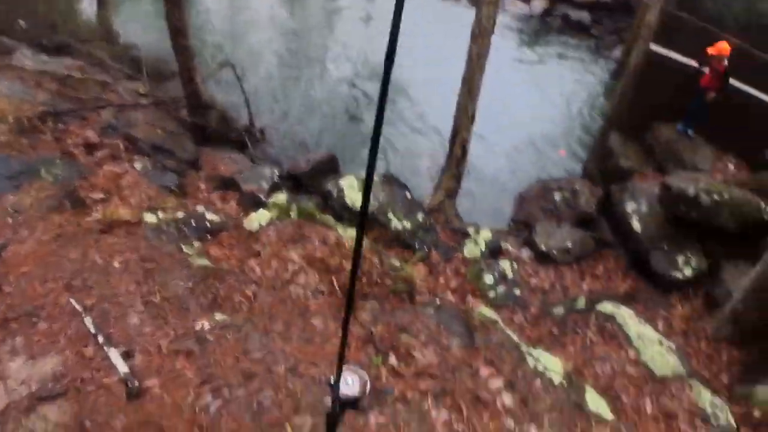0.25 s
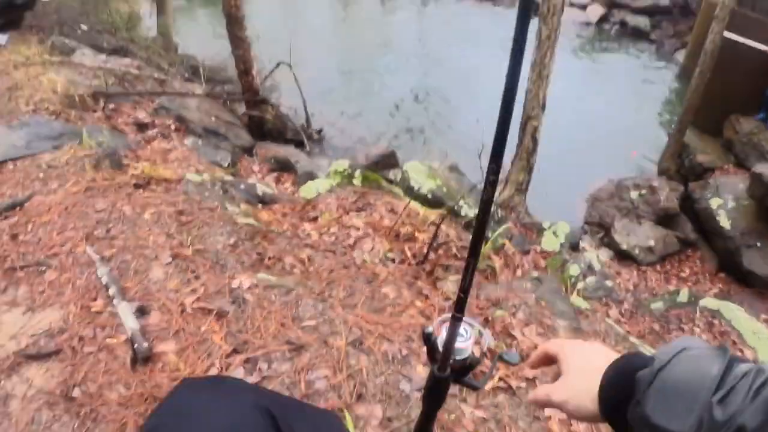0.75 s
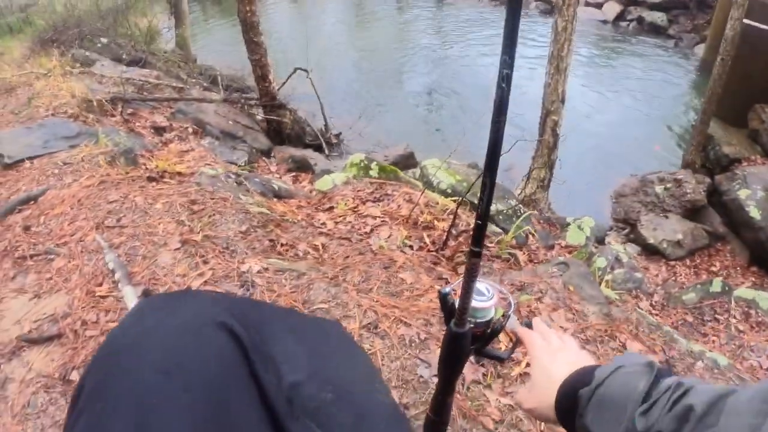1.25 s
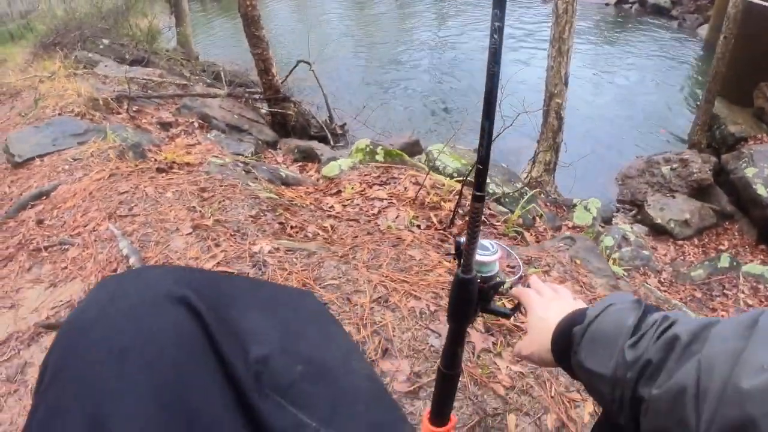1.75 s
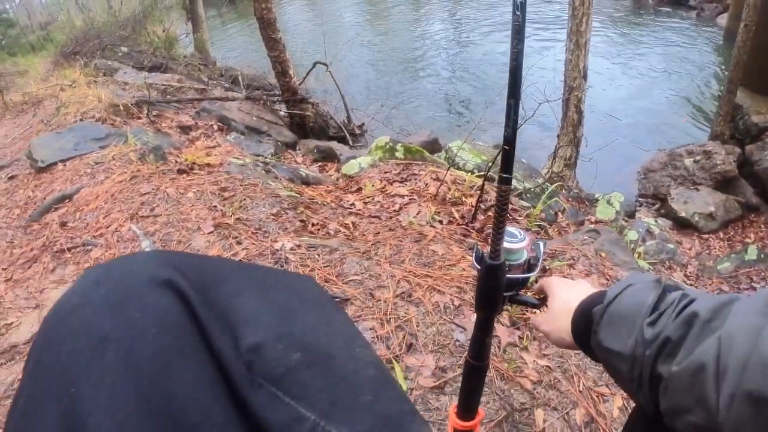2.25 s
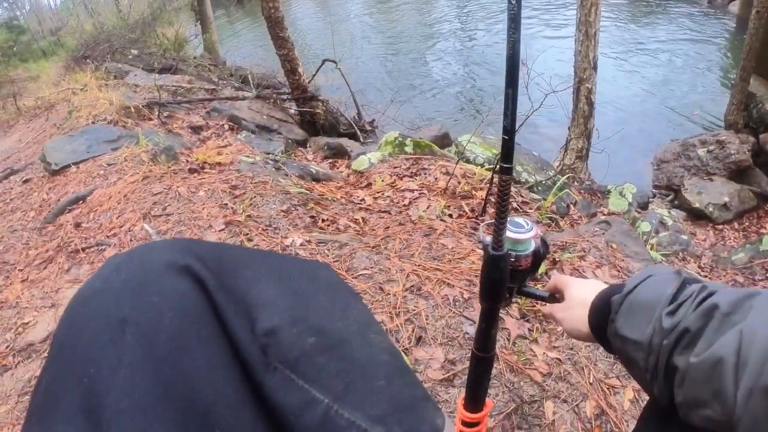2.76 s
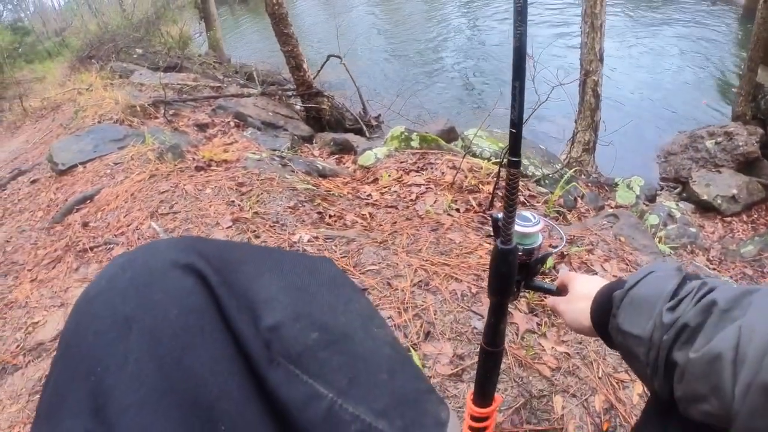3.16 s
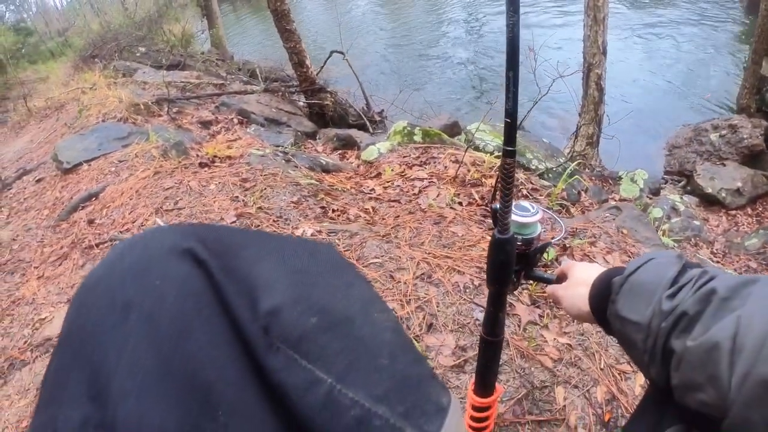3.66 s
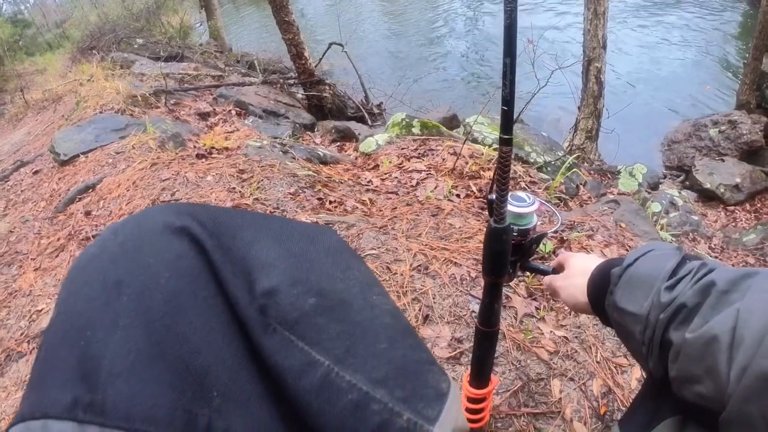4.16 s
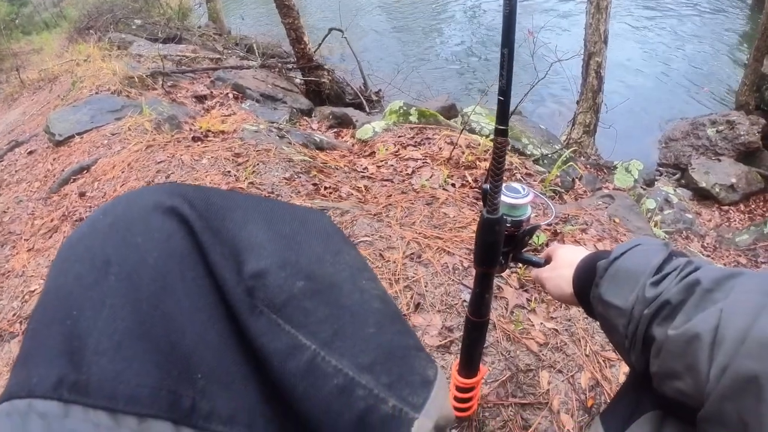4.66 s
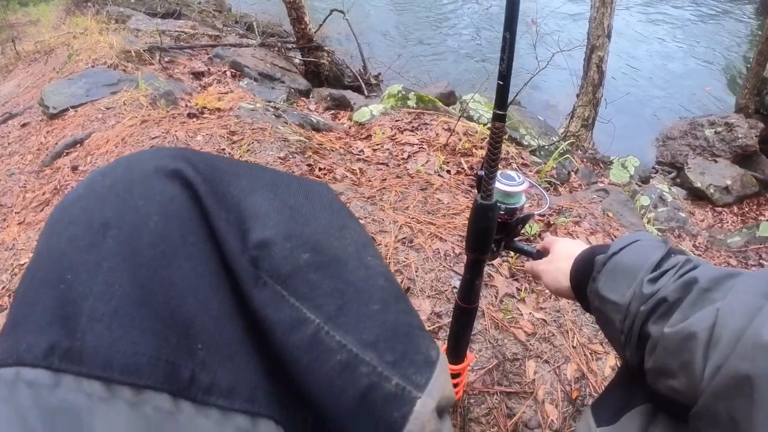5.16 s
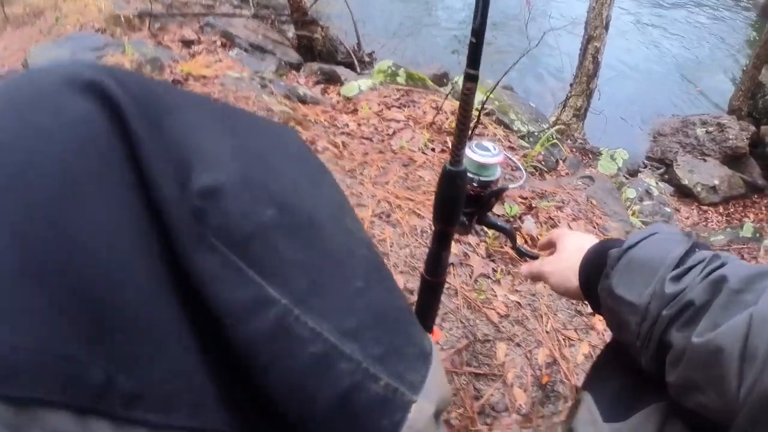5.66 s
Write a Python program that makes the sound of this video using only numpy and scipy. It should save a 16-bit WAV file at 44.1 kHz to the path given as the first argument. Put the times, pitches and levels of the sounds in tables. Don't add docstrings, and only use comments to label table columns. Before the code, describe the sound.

Heard from inside a chest-worn camera beside a creek: cloth rumble, then two clattering plastic knocks as a rod hits the housing, each briefly sinking the background. A quieter stretch follows with soft taps, tiny reel and leaf ticks and dulled rushing water with a thin hiss. Near the end, a strap jerks and rubs loudly over the shell, starting toward the right.

```python
import sys
import numpy as np
from scipy import signal
from scipy.io import wavfile

SR = 44100
rng = np.random.default_rng(int(sys.argv[2]) if len(sys.argv) > 2 else 0)


def rack_gain(trim_db):
    fader = np.asarray(trim_db, float)
    return 10 ** (fader / 20)


def pcm_store(signal):
    levels = np.round(np.clip(np.atleast_2d(signal), -1, 1) * 32767)
    wavfile.write(sys.argv[1], SR, levels.astype(np.int16).T)


N = 260190

# f/Hz, left level/dB, right level/dB, t60/s
LOW_MODES = [(105, -33.5, -15.5, 0.032), (208.5, 4, -12.5, 0.011), (328, -6, 2, 0.037),
             (347.5, 2.5, -6.5, 0.028), (495, -23.5, -21.5, 0.062)]
# f/Hz, left level/dB, right level/dB, t60/s
MAIN_MODES = [(789.9, -14, 2, 0.074), (925, -3, -19, 0.04), (990, -14.5, -43.5, 0.0069)]
# f/Hz, left level/dB, right level/dB, t60/s
SECOND_MODE = [(688, 2.1, 0.0084, 0.053)]
# f/Hz, left level/dB, right level/dB, t60/s
HIGH_MODES = [(1428, -1, 6.5, 0.019), (1517, -6, 7, 0.011), (1745, 7, -19, 0.03), (1916, 10.5, -2, 0.0054),
              (2272, 0.5, -9, 0.024), (2500, -32, -6, 0.01), (3780, -3, 2, 0.01), (4730, 2.5, 3.5, 0.018)]


def in_time(rows):
    s, *columns = np.transpose(rows)
    return [np.interp(np.arange(N) / SR, s, c) for c in columns]


def at_hz(points, hz):
    point_hz, values = np.array(points).T
    return np.interp(np.log(hz), np.log(point_hz), values)


def rms_one(x):
    return x / np.sqrt(np.mean(x ** 2) + 1e-20)


def panned(db):
    return np.array([rack_gain(db / 2), rack_gain(-db / 2)]) / np.cosh(db * np.log(10) / 40)


def low_pass(x, hz):
    return signal.sosfilt(signal.butter(8, hz, fs=SR, output="sos"), x + 1e-18)


def band_pass(x, low_hz, high_hz):
    return signal.sosfilt(signal.butter(2, [low_hz, high_hz], "band", fs=SR, output="sos"), x)


def dying_noise(pushes, t60, noise):
    return signal.lfilter([1], [1, -rack_gain(-60 / (t60 * SR))], pushes + 1e-18) * noise


def drift(rate):
    r = np.exp(-80 * np.pi * rate / SR)
    kicks = rng.standard_normal(N // 40 + 2002)
    slow = signal.lfilter([1], [1, -2 * r, r * r], kicks)[2000:]
    return np.interp(np.arange(N) / 40, np.arange(len(slow)), rms_one(slow))


def banded_noise(spectrum, likeness, shared_db, own_db, rate):
    lowest, highest = spectrum[0][0], spectrum[-1][0]
    edges = lowest * 2 ** np.arange(0, np.log2(highest / lowest) + 1 / 3, 1 / 3)
    out, together, white = 0, drift(rate), rng.standard_normal((2, 2, N))
    for k, (low, high) in enumerate(zip(edges, edges[1:])):
        mid, side = band_pass(white[k % 2], low, high)
        hz = np.sqrt(low * high)
        alike = np.clip(at_hz(likeness, hz), -1, 1)
        gain = rack_gain(at_hz(spectrum, hz) + shared_db * together + own_db * drift(rate))
        out = out + gain * (np.sqrt(1 + alike) * mid + np.sqrt(1 - alike) * side * [[1], [-1]])
    return out


def housing(pushes, modes, left_sign, damping=1):
    out = np.zeros((2, N))
    for k, (hz, left_db, right_db, t60) in enumerate(modes):
        r = rack_gain(-60 * damping / (t60 * SR))
        w = 2 * np.pi * hz / SR
        rung = signal.lfilter([0, np.sin(w)], [1, -2 * r * np.cos(w), r * r], pushes + 1e-18)
        out += (-1) ** k * rung * [[left_sign * rack_gain(left_db)], [rack_gain(right_db)]]
    return out


def blows(events, low_modes, soft_hz, hard_hz, rattle_db, rattle_s, damping, crack_db):
    s, peak_db, pan_db, low_db, second_db, high_db = np.transpose(events)
    at = np.minimum((s * SR).astype(int), N - 1)
    strength = rack_gain(peak_db + 2.5) * np.array([rack_gain(pan_db), np.ones(len(at))])
    chatter = rng.standard_normal(N)
    pushes, out = np.zeros((2, N)), np.zeros((2, N))
    families = ((low_modes, rack_gain(low_db + 6.5), 1, soft_hz),
                (MAIN_MODES, 1, -1, soft_hz),
                (SECOND_MODE, -rack_gain(second_db), -1, soft_hz),
                (HIGH_MODES, rack_gain(high_db), 1, hard_hz))
    for modes, share, sign, contact_hz in families:
        pushes[:, at] = share * strength
        rattle = dying_noise(pushes, rattle_s, chatter)
        out += housing(low_pass(pushes + rack_gain(rattle_db) * rattle, contact_hz), modes, sign, damping)
    return out + rack_gain(crack_db) * band_pass(rattle, 3200, 6500)


def rod_knocks():
    # t/s, peak level/dB, left-right level/dB, low modes level/dB, high modes level/dB
    knocks = [(0.42, -25, 1.5, -9, -3), (0.429, -27, -4.5, 4.5, 4), (0.432, -15, -10.5, 1.5, -2.5),
              (0.446, -33.5, -4, 2, -3), (0.462, -27, -5, -5, -15), (0.826, -23, -7, 7.5, -24),
              (0.838, -41, -19, 10, -36), (0.847, -28.5, -27, 5, -14), (0.857, -25, -19, -13, -18),
              (0.869, -26, -2, -8, -1), (0.877, -11.5, -4.5, -7, -12), (0.884, -14.5, -4, -8, -8),
              (0.887, -29, -4, 1, -25), (0.893, -36.5, -10.5, -6, -31)]
    second_db = -4
    hits = [(s, db, pan, low, second_db, high) for s, db, pan, low, high in knocks]
    return blows(hits, LOW_MODES, soft_hz=1210, hard_hz=2750,
                 rattle_db=-17.5, rattle_s=0.011, damping=0.97, crack_db=-33)


def strap_slips():
    # t/s, peak level/dB, low modes level/dB, second mode level/dB
    slips = [(5.277, -23, -8, -4), (5.299, -21, -27, -0.5), (5.321, -28, -6, 0), (5.379, -21, -0.5, -16),
             (5.407, -17, -1.5, -15), (5.429, -12.5, -16, 1.5), (5.454, -27, 1, 13.5),
             (5.471, -17.5, 0.5, -3), (5.487, -31.5, -18, -18), (5.501, -10.5, -21, -16),
             (5.519, -23, -22, 11), (5.534, -27, -11, -2), (5.552, -16.5, -4.5, 5), (5.579, -13, -3, 1),
             (5.611, -42.5, 9, 2), (5.653, -10, -8, 3), (5.675, -15, -12.5, -5), (5.697, -18, -2, 6),
             (5.731, -10, -11, 3.5), (5.754, -12.5, -10.5, -5), (5.776, -21, -8, 6), (5.809, -15, -5, 8.5),
             (5.83, -22.5, -5, -15), (5.856, -10.5, -10.5, 2.5), (5.892, -10, -8.5, 0.5)]
    # t/s, left-right level/dB
    path = [
        (5.48, -19.5),
        (5.66, -1.5),
    ]
    # f/Hz, left level/dB, right level/dB, t60/s
    held_modes = [(105, -16, -8.5, 0.094), (230, -7, -18, 0.0087), (334.4, -5, -7, 0.12),
                  (482, 11, -26, 0.01)]
    edge_db = -42.5
    jerks = [(s, db, np.interp(s, *np.transpose(path)), low, second, edge_db - db)
             for s, db, low, second in slips]
    return blows(jerks, held_modes, soft_hz=786, hard_hz=2580,
                 rattle_db=-30.5, rattle_s=0.028, damping=2.19, crack_db=-36.0)


def light_taps():
    # t/s, peak level/dB, low modes level/dB, high modes level/dB
    taps = [(0.215, -35.5, 1, -19), (0.241, -37, 1, -11.5), (0.359, -38.5, -3, -5),
            (0.747, -43.5, 5.5, -27), (0.985, -52.5, 11.5, -38), (1.189, -53.5, 20.5, -20),
            (1.312, -49, -14, -28), (1.339, -37.5, 2, -12), (1.356, -27.5, -3, -20),
            (1.492, -47, 15, -30), (1.536, -44, -0.5, -25), (1.696, -50, 10, -21), (4.239, -60.5, 0, 8),
            (1.817, -34, -8, -31), (1.873, -29, -24, -11), (1.958, -32, -8, -28),
               (2.043, -34.5, -12, -23), (2.113, -31.5, -1.5, -18), (2.142, -32, -5, -15.5),
               (2.185, -28, 0, -16), (2.238, -32.5, -7, -37), (2.328, -42, 5.5, -29),
               (2.377, -37.5, 2, -32), (2.553, -33, -18, -46), (2.773, -38, -19, -28),
               (2.812, -16, -23, -15.5), (2.864, -37.5, -15, -35), (2.951, -44.5, -5, -7),
               (2.972, -53, -12, 2), (3.124, -57, 3, -15), (3.144, -58.5, -17, 11),
               (3.201, -45.5, -22, -13), (3.343, -68, -16, -26), (3.495, -41, -7, -25),
               (3.644, -41, 4, -13), (3.75, -38.5, -13, -18), (3.927, -34.5, -7, -15.5),
               (4.051, -47, -6, -7), (4.433, -41, -3, -21), (4.654, -45, -2, -24), (4.746, -44.5, -20, -24),
               (5.014, -47, 5, -11), (5.123, -39.5, 7, -16)]
    pan_db, second_db = -19, -31
    touches = [(s, db, pan_db, low, second_db, high) for s, db, low, high in taps]
    return blows(touches, LOW_MODES, soft_hz=998, hard_hz=3080,
                 rattle_db=-33.0, rattle_s=0.003, damping=0.83, crack_db=-12.5)


def rubbing():
    # t/s, level/dB
    drag = [(0, -108), (.19, -40), (.35, -47), (.43, -55.5), (.7, -53.5), (.83, -36), (.88, -46.5),
            (1.1, -48.5), (1.4, -45.5), (2.0, -47), (2.3, -50.5), (3.1, -54.5), (4.3, -53), (4.93, -69),
            (5.25, -45), (5.52, -26), (5.61, -33.5), (5.9, -27.5)]
    level_db, = in_time(drag)
    bright_db = 0.33 * (-50.5 - level_db)
    sizes = rack_gain(3.5 * np.minimum(rng.exponential(1, N), 3)) * rng.choice([-1, 1], N)
    catches_per_s = 1500 * rack_gain(3.0 * drift(25))
    catches = sizes * (rng.random(N) < catches_per_s / SR)
    pushes = catches * rack_gain([[-9.0], [0.1]])
    body = housing(pushes, MAIN_MODES, -0.064, damping=1.64)
    body = low_pass(body - housing(pushes, SECOND_MODE, -0.69, damping=1.6), 915)
    bright = low_pass(housing(pushes, HIGH_MODES, 0.9, damping=0.99), 2400)
    both = body + rack_gain(bright_db - 18.5) * bright
    return both / body.mean(0).std() * rack_gain(level_db - 2.0)


def rumble():
    # t/s, level/dB, left-right level/dB
    cloth = [(0, -42, 15), (.2, -38.5, -6.5), (.43, -37, -12), (.7, -36.5, 7), (.84, -31.5, -14),
             (1.0, -36, 5.5), (1.35, -39, -8.5), (1.7, -38.5, -8), (2.0, -43.5, -11), (2.18, -38, -11),
             (2.3, -43.5, -7.5), (3.2, -43, -4.5), (4.2, -42.5, -7.5), (4.79, -45.5, -2.5),
             (4.93, -50.5, -3.5), (5.27, -39.5, -8), (5.42, -28, -16), (5.9, -38, -2.5)]
    # f/Hz, level per Hz/dB
    spectrum = [(13, -46), (22, -15.5), (79, -3), (124, 1), (234, -6.5), (305, -6.5), (396, -19.5),
                (481, -19), (600, -15.5), (780, -33.5), (1320, -120)]
    # f/Hz, left-right likeness/1
    likeness = [(30, 0.056), (130, 0.46), (300, 0.11), (600, 0.15)]
    level_db, pan_db = in_time(cloth)
    lumps = banded_noise(spectrum, likeness, shared_db=-1.0, own_db=3.5, rate=15.5)
    return rms_one(lumps) * rack_gain(level_db + 2.0) * panned(pan_db)


def ticks():
    # t/s, peak level/dB, left-right level/dB
    tick_events = [(1.6571, -41, -15), (2.0182, -43.5, -21), (2.6777, -55, -7), (2.7177, -51, -8),
                   (2.8104, -45.5, -5.5), (3.4719, -47.5, -19), (3.5493, -45, -4.5), (4.0641, -48, -17),
                   (4.3375, -51, -4.5), (4.4876, -51, -12), (4.689, -51.5, -11), (5.0898, -50, -20),
                   (5.5871, -52.5, 14)]
    s, peak_db, pan_db = np.transpose(tick_events)
    clicks = np.zeros((2, N))
    clicks[:, (s * SR).astype(int)] = rack_gain(peak_db + 17) * panned(pan_db)
    tail = dying_noise(clicks, 0.0081, rng.standard_normal(N))
    return band_pass(clicks + rack_gain(-25.0) * tail, 9000, 17000)


def flaring():
    # t/s, length/s, level/dB
    flares = [(0.677, 0.29, 4), (1.15, 0.16, 10), (1.383, 0.22, 16.5), (1.568, 0.12, 8.5), (2.115, 0.17, 5),
              (2.963, 0.07, 3.5), (3.39, 0.048, 4.5), (3.677, 0.11, 3), (4.255, 0.049, 5.5), (5.4, .12, 3),
              (5.83, 0.068, 2)]
    t = np.arange(N) / SR
    return sum(db * np.exp(-(2 * (t - s) / length_s) ** 2) for s, length_s, db in flares)


def water():
    # t/s, level/dB, left-right level/dB
    stance = [(0, -58, 12.5), (.19, -57, -2.5), (.33, -56, -6.5), (.45, -49, 0), (.69, -54, 7.5),
              (.85, -52.5, -0.5), (1.1, -56.5, 9.5), (1.37, -65, -5.5), (1.69, -60.5, -4.5),
              (2.0, -60, -2.5), (2.3, -62.5, -4.5), (3.3, -65, -4), (4.2, -63.5, -5.5), (4.79, -66, -4),
              (4.93, -72.5, -3.5), (5.15, -63.5, -7), (5.55, -63, 1.5), (5.9, -58.5, 13.5)]
    # f/Hz, level per Hz/dB
    spectrum = [(240, -0.5), (400, -3), (460, -19), (626, -9), (777, -5.5), (1070, -18.5), (1440, -17),
                (1680, -22), (4050, -34), (5690, -53), (7280, -55.5), (9320, -35.5), (12300, -20),
                (14600, -32), (16000, -27.5)]
    # f/Hz, left-right likeness/1
    likeness = [(400, 0.067), (1200, 0.59), (2500, 0.021), (5000, 0.03), (7000, 0.3), (10500, 0.64),
                (15000, 0.95)]
    water_db, pan_db = in_time(stance)
    flare_db = flaring()
    roar_db = 0.13 * (-59.5 - water_db) - 0.56 * flare_db
    rush = banded_noise(spectrum, likeness, shared_db=1.2, own_db=.4, rate=24)
    roar = low_pass(rush, 6800)
    hiss = signal.sosfilt(signal.butter(8, 6800, "high", fs=SR, output="sos"), rush)
    both = hiss + rack_gain(roar_db) * roar
    return both / hiss.mean(0).std() * rack_gain(water_db + flare_db) * panned(pan_db)


def ducking():
    # t/s, depth level/dB, recovery/s
    ducks = [
        (-.03, 11.5, 0.31),
        (.435, 28.5, 0.4),
        (.875, 21.5, 0.38),
    ]
    attack_s = 0.021
    t = np.arange(N) / SR
    dips = [np.interp(t, [s, s + attack_s, s + attack_s + back_s], [0, -db, 0]) for s, db, back_s in ducks]
    return np.min(dips, axis=0)


def scene():
    steady = rubbing() + rumble() + water()
    return rod_knocks() + strap_slips() + light_taps() + ticks() + steady * rack_gain(ducking())


def top_cut(x):
    return signal.sosfilt(signal.butter(12, 16410, fs=SR, output="sos"), x)


def record(dry):
    ports = signal.sosfilt(signal.butter(3, 42, "high", fs=SR, output="sos"), dry)
    ports = signal.sosfilt(signal.cheby2(14, 40, 15980, fs=SR, output="sos"), ports)
    return top_cut(ports)


dry = scene()
out = record(dry)
pcm_store(out)
```